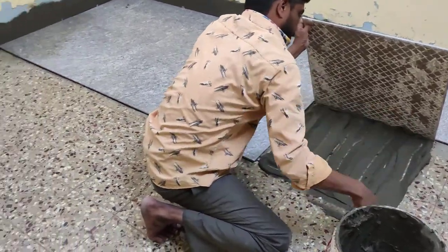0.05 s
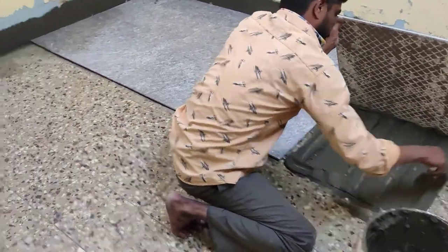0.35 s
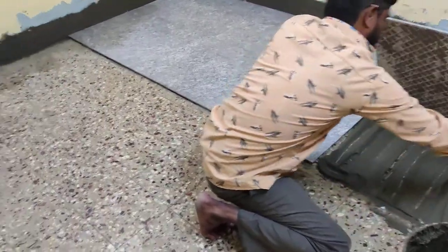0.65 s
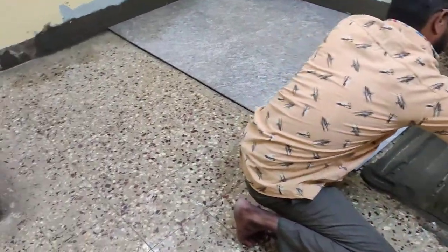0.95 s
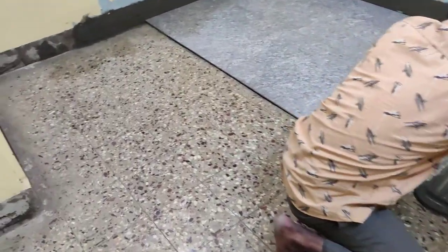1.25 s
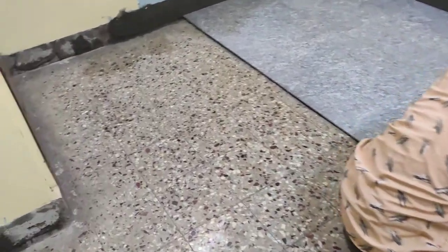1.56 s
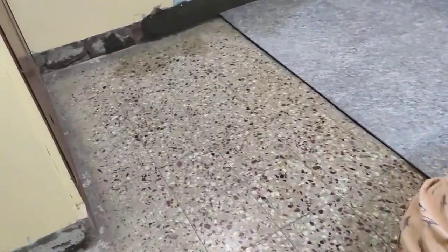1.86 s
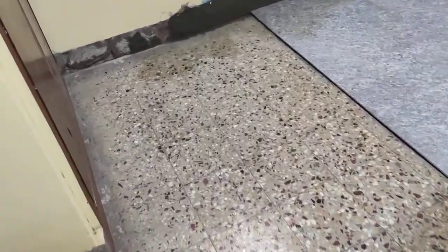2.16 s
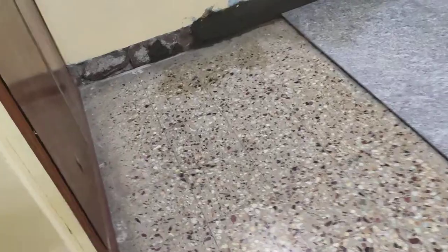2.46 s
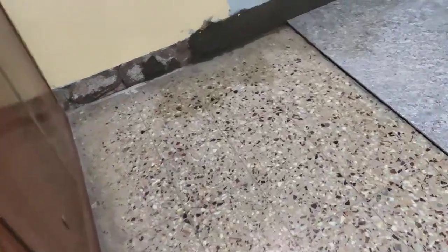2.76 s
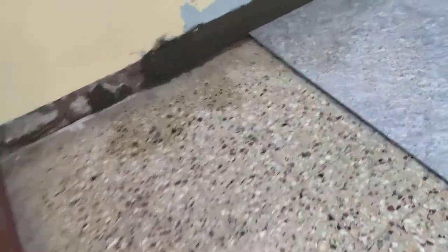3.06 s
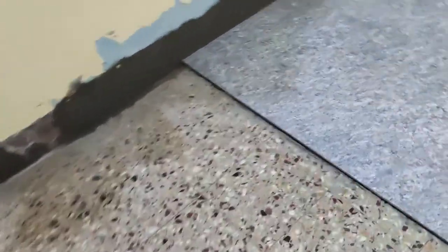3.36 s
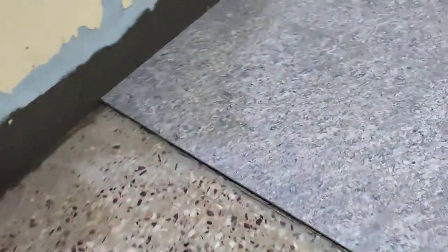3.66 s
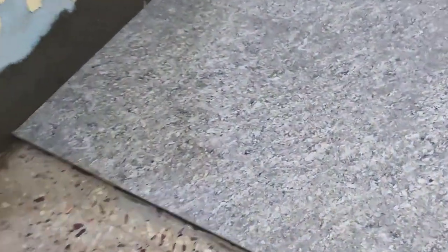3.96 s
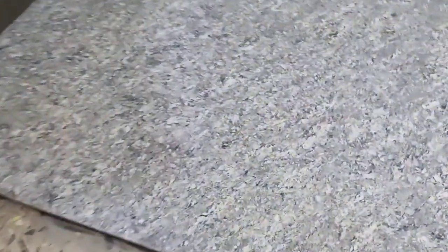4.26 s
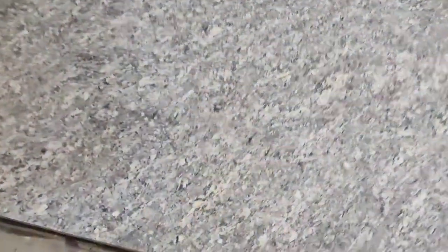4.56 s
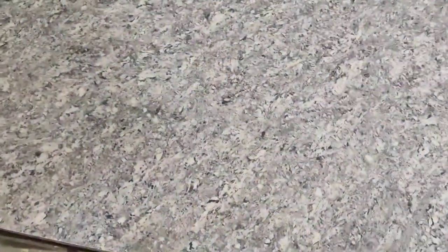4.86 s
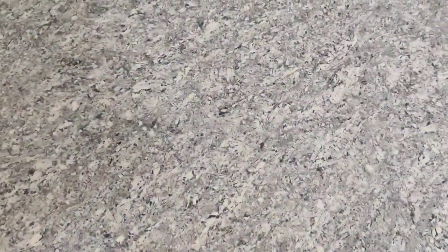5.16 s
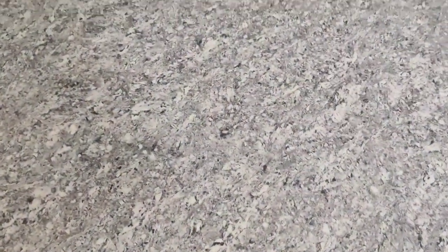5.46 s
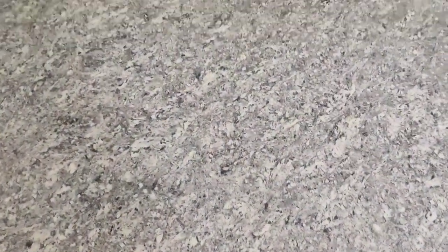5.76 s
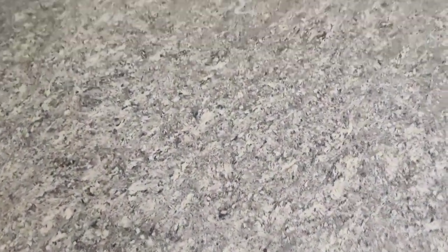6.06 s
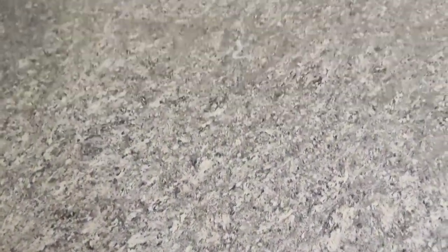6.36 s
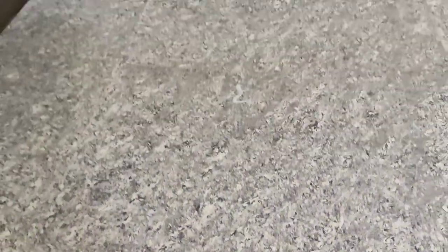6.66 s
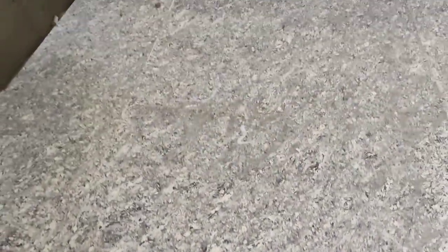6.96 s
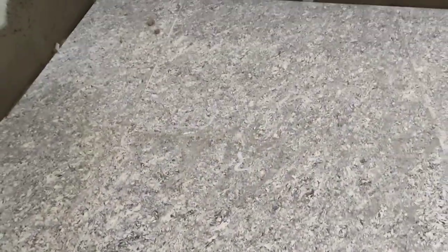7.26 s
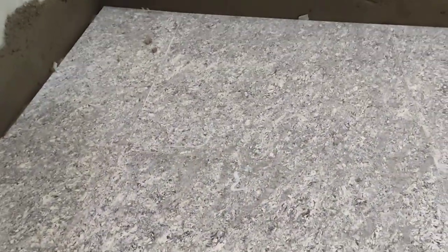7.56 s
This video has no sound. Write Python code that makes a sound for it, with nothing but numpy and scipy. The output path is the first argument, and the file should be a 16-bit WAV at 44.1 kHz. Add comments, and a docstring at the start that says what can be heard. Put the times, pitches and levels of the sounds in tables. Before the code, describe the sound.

A bare, echoing room is heard in stereo from a distance, with soft room air throughout. A brief gritty scrape and a small knock open the sound. From about 0.4 to 3 seconds a large floor tile rubs dully in adhesive, ticking on sand and giving soft, hollow knocks of varying pitch, busiest after 2 seconds. Between 3.2 and 4 seconds it is shoved over dry grit in two bursts of brighter scraping, with a sharp tick and knock at 3.7. Six firm taps, the loudest sounds, bed it down at about 4.6, 5.0, 5.3, 6.0, 6.3 and 6.6 seconds, the fourth softer. Each is a sharp crack with a short thump that shakes the floor and rings the room. A very faint low drone comes and goes outside, and one barely audible, thin, high whistle passes around 7 seconds.

```python
"""A bare, echoing room, from two spaced microphones far enough back to hear mostly the walls.
A large floor tile is lowered onto adhesive: it rubs dully, ticks on sand and knocks hollowly as it
settles, and is shoved into place over dry grit. Six firm taps bed it down, each bending the tile,
shaking the floor and ringing the room. Behind it lie room air, a low drone from outside and,
near the end, one faint, thin whistle."""
import sys
import numpy as np
from scipy import signal
from scipy.fft import rfft, irfft, next_fast_len
from scipy.io import wavfile
from scipy.ndimage import map_coordinates

SR = 44100
rng = np.random.default_rng(int(sys.argv[2]) if len(sys.argv) > 2 else 0)


def master_out(mix):
    """Clip the mix to full scale and print it as 16-bit PCM to the path in sys.argv[1]."""
    frames = np.transpose(np.atleast_2d(mix))
    ceiling = np.clip(frames, -1, 1)
    pcm = np.round(ceiling * 32767).astype(np.int16)
    wavfile.write(sys.argv[1], SR, pcm)


N = 336042

# the room's decay: (frequency [Hz], t60 [s])
ROOM_T60 = [(100, 0.92), (260, 0.67), (700, .54), (1840, 0.52), (4850, 0.44), (12800, 0.37)]
# first echoes off the walls: (delay [s], level [dB])
WALL_ECHOES = [(.0035, -16), (.007, -16.5), (.0095, -14.5), (.0135, -13.5), (0.021, -14.5), (0.036, -18.5)]
# spectrum of the room air: (frequency [Hz], relative density [dB])
AIR_SPECTRUM = [(20, -9.5), (38, -17.5), (62, -9.5), (110, -24), (166, -10.5), (207, -19), (306, -10.5),
                (416, -12), (746, -14.5), (2330, -17.5), (3080, -21), (6600, -24.5), (7800, -32.5),
                (15500, -38)]
# room air at the microphones: (time [s], level [dB])
AIR_LEVEL = [(0, -60), (4.3, -61.5), (5.8, -65)]
# spectrum of the sand under the tile: (frequency [Hz], relative density [dB])
GRIT_SPECTRUM = [(71, -73), (120, -27), (294, -12.5), (383, -8.5), (423, -7.5), (704, -10), (1040, -1.5),
                 (1170, -3.5), (1460, -1.5), (2440, -2.5), (3300, -3.5), (6600, -6), (7920, -15.5),
                 (15500, -30.5)]
# shoves over grit: (start [s], length [s], level [dB], swell [dB], resonance [Hz], treble [dB])
SHOVES = [(0.029, .12, -41, -5, 2940, 3.5), (3.18, 0.1, -36.5, -3, 1410, -4.5),
          (3.236, 0.064, -28.5, -4, 2775, -3.5), (3.274, .19, -40, -8, 2270, 8),
          (3.704, 0.19, -41.5, 2, 1400, 5), (3.815, 0.22, -36.5, -0.5, 1140, 3)]
# the tile's edge on grains of sand: (time [s], level [dB])
TICKS = [(.044, -15.5), (.902, -15), (2.1, -17), (2.213, -13), (2.265, -15.5), (2.399, -15.5),
         (2.594, -18.5), (3.189, -13.5), (3.716, -8.5)]
# hollow knocks as the tile settles: (time [s], level [dB], pitch [Hz])
KNOCKS = [(.05, -27, 343), (.825, -27, 300), (.915, -21.5, 306), (1.315, -17.5, 656), (2.004, -26, 183),
          (2.074, -19.5, 466), (2.265, -11.5, 443), (2.346, -15.5, 446), (2.592, -19, 277),
          (2.82, -20.5, 438), (3.716, -11, 1270), (3.85, -26, 420)]
# swells of the drone outside: (start [s], length [s], pitch [Hz], glide [Hz/s], level [dB])
DRONE_SWELLS = [(0.098, 1.7, 101.5, -11.5, -73), (3.498, .6, 57.2, -3, -76.5),
                (5.699, 0.82, 50.2, 16, -69.5), (6.999, .65, 53.8, 8, -74)]
# rubs in the adhesive: (start [s], length [s], level [dB], swell [dB], treble [dB])
RUBS = [(0.359, 0.57, -62.5, 9, -16), (.89, 0.33, -50, -11.5, -3.5), (1.17, 0.29, -51.5, 0, -5),
        (1.381, .24, -44, -3.5, -1), (1.761, 0.52, -59.5, 7, -4.5), (2.194, 0.33, -45.5, -3.5, 2.5),
        (2.5, 0.36, -50.5, 8.5, 3.5), (2.763, 0.15, -43.5, -7, 3)]
# taps on the tile: (time [s], relative level [dB], treble [dB], relative thump [dB])
TAPS = [(4.5843, -1, 7, 2), (5.0033, -2, 3.5, 5.5), (5.3164, -4, 3, 4.5), (6.0033, -9, 0.5, 6.5),
        (6.2993, -4.5, 2, 6), (6.5579, -5, -3, 6.5)]
# spectrum of a blow on the glaze: (frequency [Hz], relative density [dB])
CRACK_SPECTRUM = [(60, -40.5), (120, -38), (160, -26), (220, -20), (385, -4.5), (600, -6.5), (900, -4.5),
                  (1200, -4.5), (2100, -7.5), (2780, -13), (3760, -11.5), (5320, -23.5), (6710, -21.5),
                  (8000, -35), (9600, -36.5), (12000, -47.5), (15500, -57.5)]
# the tile's bending modes, damped by the adhesive: (frequency [Hz], relative level [dB], t60 [s])
TILE_MODES = [(255, -8, 0.047), (360.4, 2, 0.049), (472, 10.5, 0.019), (596, 4.5, 0.029),
              (953, -5.5, 0.078)]
# modes of the floor under the blows: (frequency [Hz], relative level [dB], t60 [s])
FLOOR_MODES = [(45, -2, 0.21), (65.3, -0.5, 0.27), (85.3, -7, 1)]
# the room's standing waves: (frequency [Hz], relative level [dB], t60 [s])
ROOM_MODES = [(205, -14, 0.93), (271.5, -9, 0.28), (318.3, -6, 0.39), (391, 0.5, 0.56), (427, -5, 0.41),
              (457, -4.5, 0.41), (505, -8.5, 0.58), (563, 0.5, 0.58), (675, -2.5, 0.44), (730, -3, 0.43),
              (854, 1.5, 0.45), (1080, -8.5, 0.26), (1187, -1.5, 0.28), (1410, -9.5, 0.61),
              (2085, -7, 0.48)]

MIC_DELAY_S = 0.00046  # sound's travel time between the microphones
ATTACK_S, RELEASE_S = 0.029, 0.073  # every stroke gets going and comes to rest alike


def amp(db):
    """Decibels to gain."""
    return 10 ** (np.asarray(db) / 20)


def unit(x):
    """Scale to rms 1."""
    return x / np.sqrt(np.mean(x ** 2) + 1e-20)


def along(points, hz):
    """Read (frequency, value) points on a log frequency axis."""
    point_hz, values = np.transpose(points)
    return np.interp(np.log(hz + 1), np.log(point_hz + 1), values)


def filtered(x, response):
    """Filter x by a gain given as a function of frequency."""
    n = x.shape[-1]
    padded = next_fast_len(n + SR // 4)
    return irfft(rfft(x, padded) * response(np.fft.rfftfreq(padded, 1 / SR)), padded)[..., :n]


def add(out, s, x):
    """Mix x into out from time s."""
    start = max(round(s * SR), 0)
    out[..., start:start + x.shape[-1]] += x[..., :max(out.shape[-1] - start, 0)]


def shelf(hz, edge_hz, order):
    """Rises from 0 below the edge to 1 above it."""
    return 1 - 1 / (1 + (hz / edge_hz) ** order)


def resonance(hz, centre_hz, q):
    """Gain of one resonance, 1 at its centre."""
    return 1 / np.sqrt(1 + (q * ((hz + 1) / centre_hz - centre_hz / (hz + 1))) ** 2)


def diffuse(n, bass_coherence=0.92):
    """Noise arriving from all sides: alike at both microphones in the bass only."""
    def split(hz):
        coherence = np.sinc(2 * hz * MIC_DELAY_S) * bass_coherence
        return np.sqrt([(1 + coherence) / 2, (1 - coherence) / 2])
    mid, side = filtered(rng.standard_normal((2, n)), split)
    return np.array([mid + side, mid - side])


def room_air():
    """A soft, bass-heavy rush all round the microphones, slowly sinking in level."""
    level_db = np.interp(np.arange(N) / SR, *np.transpose(AIR_LEVEL))
    return amp(level_db) * unit(filtered(diffuse(N), lambda hz: amp(along(AIR_SPECTRUM, hz))))


def reverberation(build_s=0.00092):
    """A diffuse tail of energy 1 per microphone; the treble dies first."""
    hz, t, spectra = signal.stft(diffuse(SR * 3 // 4), SR, nperseg=256)
    decay = amp(-60 * t / along(ROOM_T60, hz)[:, None])
    tail = signal.istft(spectra * decay, SR, nperseg=256)[1]
    tail *= 1 - np.exp(-np.arange(tail.shape[1]) / SR / build_s)
    return tail / np.sqrt(np.sum(tail ** 2) / 2)


def through_room(x, tail, direct_db):
    """Sound reaches the pair directly (left first), off walls on random sides, and as the tail."""
    paths = np.zeros_like(tail)
    add(paths[0], 0, amp([direct_db]))
    add(paths[1], MIC_DELAY_S, amp([direct_db]))
    for delay, db in WALL_ECHOES:
        lag = MIC_DELAY_S * rng.uniform(-1, 1) / 2
        add(paths[0], delay + lag, amp([db]))
        add(paths[1], delay - lag, amp([db]))
    return signal.fftconvolve(x[None], paths + tail, axes=1)


def grains(n, per_s, spread_db=4):
    """Sand grains give way at random, each an impulse of its own strength and sign."""
    slips = rng.random(n) < per_s / SR
    return slips * amp(spread_db * rng.normal(size=n)) * rng.choice([-1, 1], n)


def stroke(length, swell_db, treble_db, centre_hz, resonance_db, body_db, snap_db):
    """Sand catches and slips under the sliding tile; the level changes by swell_db along the way."""
    def colour(hz):
        body = body_db * (1 - shelf(hz, 800, order=6))
        treble = treble_db * shelf(hz, 2400, order=3)
        peak = resonance_db * resonance(hz, centre_hz, q=4.5)
        return amp(along(GRIT_SPECTRUM, hz) + body + treble + peak)
    t = np.arange(0, length, 1 / SR)
    speed = np.clip(np.minimum(t / ATTACK_S, (length - t) / RELEASE_S), 0, 1)
    envelope = np.sin(np.pi / 2 * speed) * amp(swell_db * (t / length - 0.5))
    # the slide is jerky: grains give way in clumps
    catch_db = 2 * map_coordinates(rng.standard_normal(128), [t * 90], mode="mirror")
    crackle = unit(grains(len(t), per_s=900))
    hiss = 0.34 * rng.standard_normal(len(t))
    friction = unit(filtered(amp(catch_db) * (crackle + hiss), colour))
    tail = reverberation()
    slide = through_room(envelope * friction, tail, direct_db=-6)
    # a few coarse grains are crushed at the open edge with a dry, bright snap
    coarse = grains(len(t), per_s=60)
    snaps = unit(filtered(coarse, lambda hz: amp(along(GRIT_SPECTRUM, hz)) * shelf(hz, 7000, order=2)))
    return slide + amp(snap_db) * through_room(envelope * snaps, amp(-8) * tail, direct_db=-3)


def shoves():
    """The tile's dry edge scrapes over grit: bright, with less bass."""
    out = np.zeros((2, N))
    for s, length, db, swell_db, centre_hz, treble_db in SHOVES:
        shove = stroke(length, swell_db, treble_db, centre_hz, resonance_db=7, body_db=-1, snap_db=-16.5)
        add(out, s, amp(db) * shove)
    return out


def click(colour_db, size=2048):
    """One brief contact: a minimum-phase pulse of energy 1 with the given spectrum."""
    cepstrum = irfft(np.log(amp(colour_db(np.fft.rfftfreq(size, 1 / SR)))))
    cepstrum[1:size // 2] *= 2
    cepstrum[size // 2 + 1:] = 0
    pulse = irfft(np.exp(rfft(cepstrum)))
    return pulse / np.linalg.norm(pulse)


def ticks():
    """The tile's edge ticks on grains of sand."""
    out = np.zeros((2, N))
    tick = click(lambda hz: along(GRIT_SPECTRUM, hz))
    for s, db in TICKS:
        add(out, s, amp(db) * through_room(tick, reverberation(), direct_db=-7.5))
    return out


def radiated(x, cut_hz, order):
    """A thin plate radiates little bass."""
    return signal.sosfilt(signal.butter(order, cut_hz, "highpass", fs=SR, output="sos"), x)


def knocks():
    """The settling tile knocks hollowly, at a pitch set by where it touches."""
    out = np.zeros((2, N))
    for s, db, pitch_hz in KNOCKS:
        def hollow_db(hz):
            return 20 * np.log10(resonance(hz, pitch_hz, q=5.4) * resonance(hz, pitch_hz, q=0.67) + 1e-5)
        knock = radiated(click(hollow_db), cut_hz=250, order=3)
        add(out, s, amp(db) * through_room(knock, reverberation(), direct_db=-6.5))
    return out


def tone(hz, waver):
    """A tone that swells and fades once; hz is its pitch per sample, waver its rms share of drift."""
    drift = unit(filtered(rng.standard_normal(len(hz)), lambda f: 1 - shelf(f, 29, order=4)))
    swell = np.sin(np.linspace(0, np.pi, len(hz)))
    phase = 2 * np.pi * np.cumsum(hz * (1 + waver * drift)) / SR
    return swell * np.sqrt(2) * np.sin(phase)


def drone():
    """A low, gliding drone comes and goes far off outside, alike at both microphones."""
    out = np.zeros((2, N))
    for s, length, hz, glide, db in DRONE_SWELLS:
        add(out, s, amp(db) * tone(hz + glide * np.arange(0, length, 1 / SR), waver=0.015))
    return out


def rubs():
    """The tile rubs dully in the adhesive; the broad, wet contact gives extra bass."""
    out = np.zeros((2, N))
    for s, length, db, swell_db, treble_db in RUBS:
        rub = stroke(length, swell_db, treble_db, centre_hz=675, resonance_db=9, body_db=3, snap_db=-24)
        add(out, s, amp(db) * rub)
    return out


def ring(modes, length_s, attack_s, scatter_db):
    """Struck modes die away from random strengths and phases; energy 1."""
    t = np.arange(int(length_s * SR)) / SR
    x = np.zeros(len(t))
    for hz, db, t60 in modes:
        decay = amp(db + scatter_db * rng.normal() - 60 * t / t60)
        x += decay * np.sin(2 * np.pi * (hz * t + rng.random()))
    x *= 1 - np.exp(-t / attack_s)
    return x / np.linalg.norm(x)


def taps():
    """Each blow cracks on the glaze, bends the tile, shakes the floor and wakes standing waves."""
    out = np.zeros((2, N))
    shared_tail = reverberation(build_s=0.0033)
    drift_rad = 0.63  # the microphones drift, so part of the tail is new at each blow
    for s, db, treble_db, thump_db in TAPS:
        tail = np.cos(drift_rad) * shared_tail + np.sin(drift_rad) * reverberation(build_s=0.007)
        crack = click(lambda hz: along(CRACK_SPECTRUM, hz) + treble_db * shelf(hz, 1900, order=2))
        add(out, s, amp(db + 14) * through_room(crack, tail, direct_db=-21))
        bending = ring(TILE_MODES, length_s=0.13, attack_s=0.0035, scatter_db=1.5)
        thump = radiated(bending, cut_hz=200, order=5)
        add(out, s, amp(db + thump_db + 3) * through_room(thump, amp(-15) * tail, direct_db=-1))
        add(out, s, amp(db - 24) * ring(FLOOR_MODES, length_s=0.8, attack_s=0.003, scatter_db=3.5))
        mid, side = [ring(ROOM_MODES, length_s=0.88, attack_s=0.0063, scatter_db=2.5) for _ in range(2)]
        add(out, s, amp(db + 4) * np.array([mid + 0.56 * side, mid - 0.54 * side]))
    return out * amp([[0.4], [-0.4]])  # a shade louder on the left


def whistle(start_s=6.87, length_s=0.56, top_hz=5700, sag_hz=400, db=-78):
    """A faint, thin whistle arches once in pitch and level, wavering differently on each side."""
    out = np.zeros((2, N))
    arch_hz = top_hz - sag_hz * np.linspace(-1, 1, int(length_s * SR)) ** 2
    add(out, start_s, amp(db) * np.array([tone(arch_hz, waver=0.006) for _ in range(2)]))
    return out


def scene():
    """All sources at the two microphones."""
    return room_air() + shoves() + ticks() + knocks() + drone() + rubs() + taps() + whistle()


def record(dry):
    """The recorder keeps nothing above its band limit."""
    return filtered(dry, lambda hz: 1 - shelf(hz, edge_hz=15750, order=200))


dry = scene()
out = record(dry)
master_out(out)
```